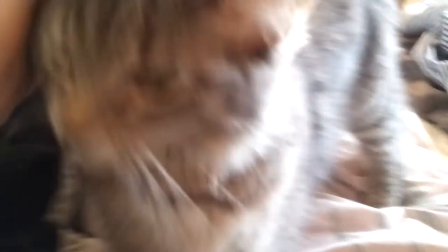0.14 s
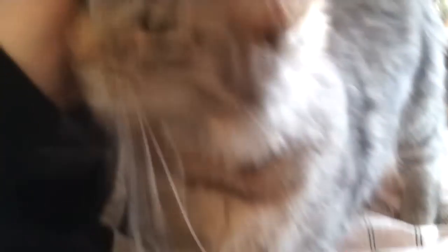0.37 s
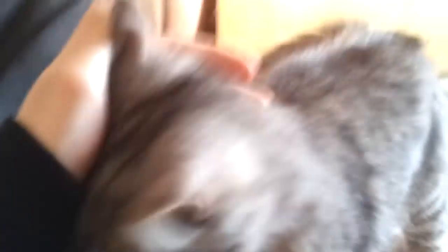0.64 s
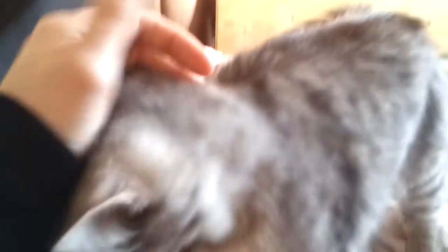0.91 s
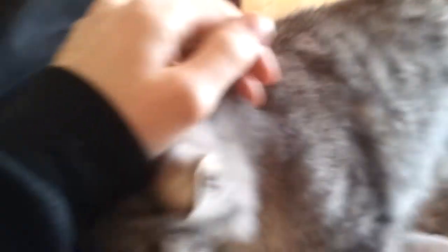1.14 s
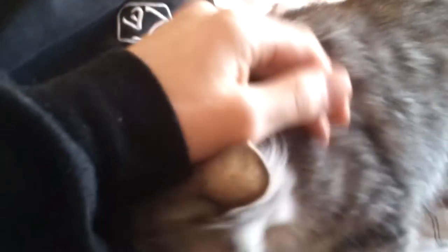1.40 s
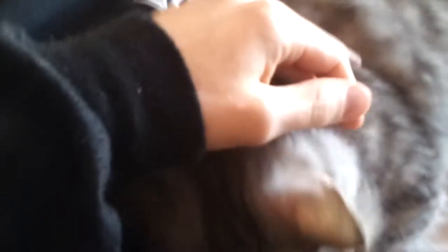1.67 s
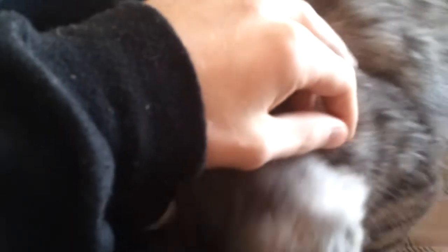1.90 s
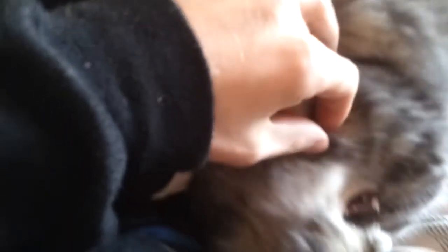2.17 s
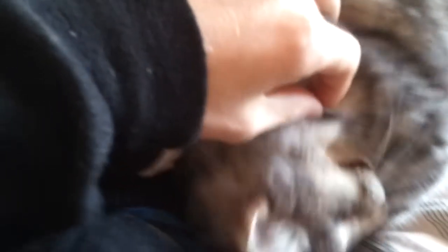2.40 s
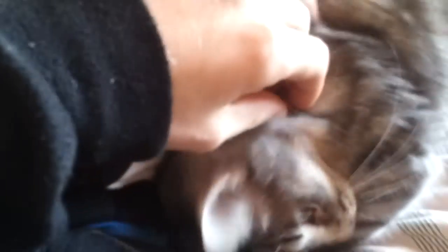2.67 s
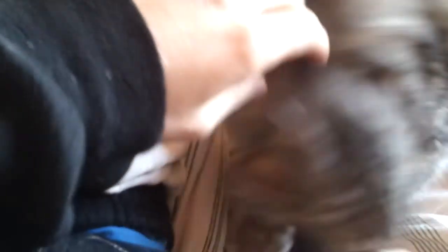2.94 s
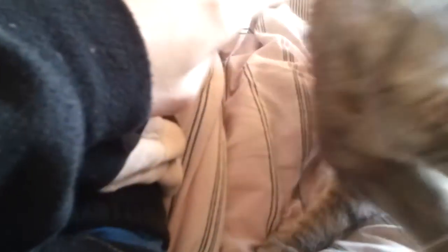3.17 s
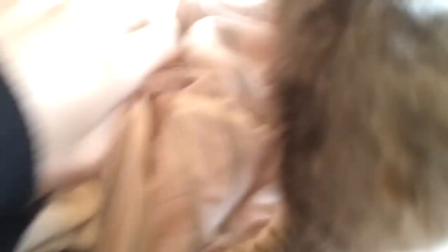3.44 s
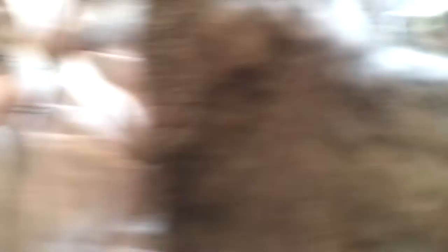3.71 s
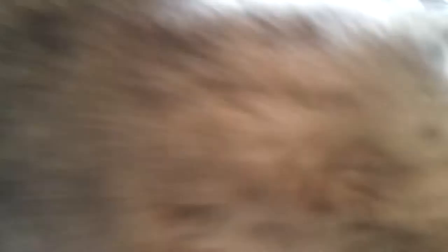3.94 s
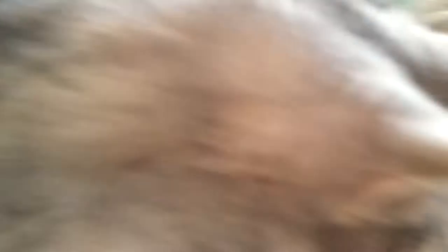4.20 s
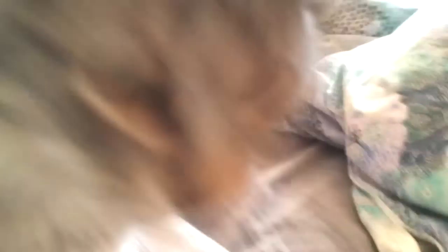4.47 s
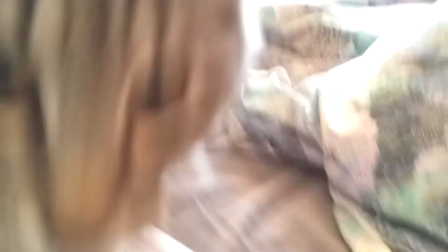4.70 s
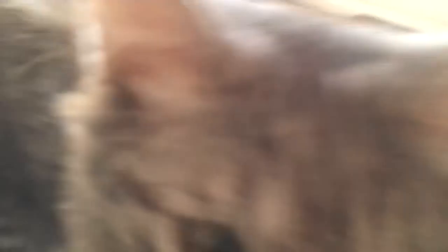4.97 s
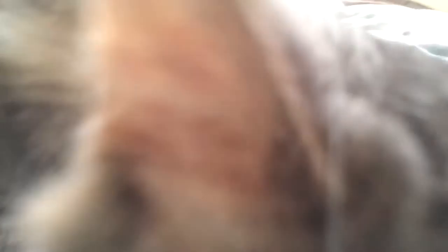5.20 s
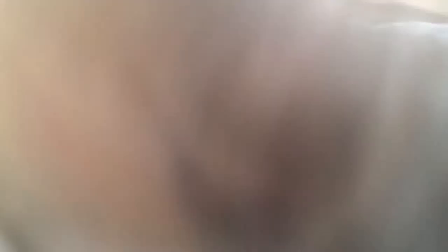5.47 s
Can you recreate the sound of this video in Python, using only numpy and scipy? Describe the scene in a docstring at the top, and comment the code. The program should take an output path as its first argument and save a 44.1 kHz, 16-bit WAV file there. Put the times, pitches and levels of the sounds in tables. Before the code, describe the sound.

A cat purrs close to a handheld phone, dry and intimate, over steady soft hiss and lumpy low hand rumble. From 0 s the purr is a low, throaty flutter of about thirty beats a second, with breathy rattles around 0.3 and 0.55 s and a soft push at 0.53. At about 1.15 s a breathy trill bursts out and passes at 1.3 into a thin meow, rising quickly from a chirpy, hoarse start to a high, nearly level tone, brightening as the mouth opens, then dropping and breaking at 2.35. A light fur rub follows; the purr returns, strongest near 3 s, with a small double click there. Dull fur strokes brush past at 3.7-4.7 s, with faint taps at 3.73 and 4.5. From 5 to 5.4 s raspy, airy trilled puffs come forward. At 5.44-5.6 s loud cracks, thumps and coarse fur friction end it abruptly.

```python
"""On a bed, close to a phone, a cat purrs: its larynx beats about thirty times a second, in and out,
and every beat makes the chest ring. At times it opens its mouth and the beats chop the breath noise
into a trill; an early trill passes into a thin meow, harmonics weighted by the mouth's resonances.
Fur brushes the phone as clumpy noise, and soft pushes and hard contacts knock its case.
Under it all lie coloured noises: microphone hiss and the rumble of the holding hand."""
import sys
import numpy as np
from scipy import signal
from scipy.fft import rfft, irfft, next_fast_len
from scipy.io import wavfile
from scipy.ndimage import uniform_filter1d, map_coordinates

SR = 44100
rng = np.random.default_rng(int(sys.argv[2]) if len(sys.argv) > 2 else 0)


def boost(x):
    """Linear amplitude factor 10**(x/20) for a level x in decibels (scalar or array-like)."""
    u = np.asarray(x, float) / 20
    return 10 ** u


def int16_out(signal):
    """Quantize to a 16-bit WAV file."""
    q = np.round(np.clip(np.atleast_2d(signal).T, -1, 1) * 32767)
    wavfile.write(sys.argv[1], SR, q.astype(np.int16))


N = 246959
T = np.arange(N) / SR

# Runs of beats: a half breath or part of one; one run fills the meow.
# Each row: first beat and last beat in seconds, number of beats.
RUNS = [(0, .084, 4), (.115, .768, 22), (.797, 1.066, 10), (1.107, 1.107, 1), (1.163, 1.329, 7),
        (1.355, 2.25, 31), (2.28, 2.59, 11), (2.652, 2.75, 4), (2.825, 3.027, 8), (3.06, 3.16, 4),
        (3.227, 3.456, 8), (3.488, 3.96, 16), (3.983, 4.298, 12), (4.335, 4.82, 17), (4.852, 4.996, 6),
        (5.014, 5.091, 4), (5.12, 5.206, 4), (5.233, 5.286, 3), (5.324, 5.408, 4), (5.437, 5.615, 7)]
# The chest in each run of beats, all but silent under the meow.
# Each row: level at the start and at the end in dB, nominal resonance in Hz, strain 0-1.
CHEST = [(-53, -54.5, 220, .1), (-52, -52.5, 179, 0.08), (-59, -50, 213, 0.07), (-49, -51, 224, .1),
         (-56.5, -53.5, 240, 0.32), (-92, -93, 200, 0.28), (-62, -66, 210, 0.04), (-55, -58, 217, .02),
         (-51.5, -45, 234, 0.28), (-42, -55.5, 205, 0.31), (-49.5, -64.5, 183, 0.03),
         (-55.5, -56.5, 160, 0.01), (-51.5, -52.5, 222, 0.05), (-52, -54.5, 165, 0.07),
         (-55.5, -63, 187, 0.07), (-60, -54, 260, 0.25), (-55.5, -51.5, 264, 0.24),
         (-47.5, -45.5, 245, 0.1), (-47, -47, 240, 0.03), (-70, -62, 210, 0.07)]


def purr():
    """Impulse response: each beat, and the folds' reopening, rings the chest; airflow flutters around it."""
    width_hz, attack_s = 114, 0.00051
    reopen_s, reopen_db, strain_db = 0.00621, -9, -4  # unstrained delay and level, change at full strain
    flutter_peak_s, flutter_width_s = .022, 0.012

    beats = np.zeros(N)
    t = np.arange(SR // 20) / SR

    def ring(hz):
        decay = np.exp(-np.pi * width_hz * t)
        return np.sin(2 * np.pi * hz * t) * decay * (1 - np.exp(-t / attack_s))

    luck = rng.standard_normal((220, 5))
    airflow = rng.standard_normal((220, 2 * len(t)))
    for at, (size, late, pitch, size2, pitch2), air in zip(beat_times(), luck, airflow):
        *_, hz, strain = [chest for run, chest in zip(RUNS, CHEST) if run[0] <= at][-1]
        start = max(at - .002 + .0003 * late, 0)
        add(beats, start, boost(size) * ring(hz * (1 + .03 * pitch)))

        again = boost(reopen_db + strain_db * strain + 0.98 * size2)
        delay = reopen_s * (1 + 1.87 * strain)
        add(beats, start + delay, again * ring(1.3 * hz * (1 + .05 * pitch2)))

        flap = signal.iirpeak(hz, 1.1, fs=SR)
        flutter = signal.lfilter(*flap, signal.lfilter(*flap, air))[len(t):]
        flutter = flutter * np.exp(-((t - flutter_peak_s) / flutter_width_s) ** 2)
        add(beats, max(start - flutter_peak_s, 0), strain * unit(flutter))

    beats = filtered(beats, lambda f: no_bass(f, corner_hz=83.0))
    loud = np.sqrt(np.abs(uniform_filter1d(beats ** 2, SR // 8)) + 1e-6)
    return purr_level() * beats / loud


def purr_level():
    """Amplitude envelope: each run of beats rises, drifts from its first level to its last and sinks."""
    rise_share, fall_share, dip_db = 0.085, .12, -8  # shares of a run; dip at the ends of a long one
    first, last, _ = np.transpose(RUNS)
    k = np.clip(np.searchsorted(first, T + .01) - 1, 0, None)
    length = (last - first + .03)[k]
    done = np.clip((T - first[k]) / length, 0, 1)
    start_db, end_db = np.transpose(CHEST)[:2, k]
    drift_db = start_db + done * (end_db - start_db)
    dip = np.exp(-done / rise_share) + np.exp((done - 1) / fall_share)
    dip = dip * np.minimum(length / 0.26, 1)  # short runs dip less
    return uniform_filter1d(boost(drift_db + dip_db * dip + 1.25 * wobble(7)), SR // 200)


def beat_times():
    """Periodic excitation: the moments of the larynx beats, even within each run."""
    return np.concatenate([np.linspace(*row) for row in RUNS])


def beat_phase():
    """Phase of the periodic excitation: where in its beat the larynx is, 0-1."""
    times = beat_times()
    return np.interp(T, times, np.arange(len(times))) % 1


def trill():
    """Amplitude modulation of turbulence: the folds shut once per beat; their edges creak unevenly."""
    # Puffs through the open mouth. Each row: start, peak and end in seconds, level at the peak in dB,
    # lean (below 0 each beat bursts then fades, above 0 it swells then stops).
    puffs = [(.18, .315, .41, -55.5, 3.8), (.44, .56, .65, -66, 3.4), (1.08, 1.1, 1.127, -62, 3),
             (1.14, 1.29, 1.43, -50, -5), (2.25, 2.35, 2.4, -51, -1.5), (4.99, 5.06, 5.14, -42, -.25),
             (5.04, 5.19, 5.25, -41.5, -.2), (5.226, 5.24, 5.29, -44, -5), (5.27, 5.3, 5.35, -43.5, -.6),
             (5.32, 5.4, 5.46, -49, 1.8)]
    slacken_s, slack_chop, slack_lean = .09, .55, -.3  # blowing out, folds start tight and slacken

    phase, flow = beat_phase(), np.zeros(N)
    for start, peak, end, db, lean in puffs:
        if lean < 0:
            tight = np.exp(-np.clip(T - start, 0, None) / slacken_s)
            burst = np.exp((slack_lean + tight * (lean - slack_lean)) * phase) * (phase < .8)
        else:
            tight = 1
            burst = np.exp(-lean * (1 - phase))
        burst = uniform_filter1d(burst, SR // 1500)
        burst /= np.sqrt(np.abs(uniform_filter1d(burst ** 2, SR // 16)))
        chop = slack_chop + tight * (1 - slack_chop)
        puff = boost(db) * arch(start, peak, end) * (1 - chop * (1 - burst))
        flow = np.maximum(flow, puff)

    creak = np.cumsum(250 * (1 + .25 * wobble(60))) / SR % 1  # phase of slips, near 250 a second
    grain = unit(.6 + np.exp(-creak / .2)) * boost(wobble(150) + wobble(700))
    hz, t, z = signal.stft(flow * grain * rng.standard_normal(N), SR, nperseg=256)
    shape = tract(hz[:, None], t) ** 0.88  # turbulence blurs the peaks
    shape = shape / np.sqrt(np.mean(shape ** 2, 0))
    return signal.istft(z * shape, SR, nperseg=256)[1][:N]


def meow():
    """Source and filter: harmonics weighted by the mouth; hoarseness shakes pitch and chops overtones."""
    # Each row: time in seconds, nominal pitch in Hz, fundamental and second harmonic levels in dB.
    melody = [(1.315, 415, -57, -66), (1.35, 365, -51, -59), (1.388, 450, -53, -55),
              (1.408, 430, -53.5, -55), (1.45, 520, -62, -54), (1.485, 565, -65, -57),
              (1.55, 545, -70, -56), (1.63, 566, -72, -60), (1.88, 552, -62, -62), (1.96, 544, -61, -59.5),
              (2.1, 549, -57.5, -58.5), (2.265, 536, -58, -55.5), (2.305, 500, -52, -55),
              (2.35, 485, -52, -60), (2.365, 450, -68, -74)]
    hoarse_start, clears_s, hoarse_held, breaks_s = .3, .06, .045, .045
    warble = .06  # share of pitch that each beat swings a fully hoarse voice

    cut = slice(round(melody[0][0] * SR), round(melody[-1][0] * SR))
    t, phase = T[cut], beat_phase()[cut]
    hz, first_db, over_db = curves(melody, t)

    hoarse = hoarse_held + hoarse_start * np.exp((t[0] - t) / clears_s)
    hoarse = hoarse + 1 / (1 + ((t[-1] - t) / (2 * breaks_s)) ** 8)  # the voice breaks at the end
    steady_shake = .0045 * wobble(60)[cut]
    beat_swing = warble * np.cos(2 * np.pi * (phase - .15))
    shake = steady_shake + hoarse * (.03 * wobble(150)[cut] + beat_swing)
    hz = hz * (1 + shake)
    turns = 2 * np.pi * np.cumsum(hz) / SR

    overtones = 0
    for k in range(2, 15):
        flicker = boost(1.8 * wobble(30)[cut] + k / 5 * wobble(6)[cut])
        gain = boost(over_db) * flicker * tract(k * hz, t) / tract(2 * hz, t)
        overtones += gain * np.sin(k * turns + rng.uniform(0, 2 * np.pi))

    chop = uniform_filter1d(1 - np.clip(hoarse, 0, 1) * (phase > .72), SR // 400)
    fundamental = boost(first_db + 2.0 * wobble(30.1)[cut]) * np.sin(turns)
    out = np.zeros(N)
    out[cut] = np.sqrt(2) * (fundamental + chop * overtones) * signal.windows.tukey(len(t), .03)
    return out


def tract(hz, t):
    """Formant resonance: gain of the mouth at hz and t, four steep moving peaks and weaker steady ones."""
    # Each row: time in seconds, first and second resonance in Hz, opening 0-1.
    mouth = [(.3, 1160, 2620, 0.94), (1.15, 950, 2000, 0), (1.3, 950, 2120, 0.45), (1.45, 940, 2240, 0.37),
             (1.55, 1210, 2440, 0.39), (1.66, 1280, 2000, 0.42), (1.77, 1270, 2200, 0.59),
             (1.88, 1223, 2100, 0.89), (2.0, 1170, 2200, 0.99), (2.25, 1120, 2100, 0.91),
             (2.37, 960, 2030, 0.87), (5.02, 977, 1860, 0.01), (5.13, 1080, 2160, 0.48),
             (5.22, 1070, 2130, 0.66), (5.27, 1100, 2200, 0.69), (5.33, 1080, 2800, .5)]
    # What opening does. Each row: opening 0-1, third and fourth resonance in Hz,
    # second, third and fourth resonance levels in dB over the first.
    postures = [(0, 4350, 4980, -14, -38, -26), (.4, 4400, 5340, -3.5, -10.5, -12),
                (.6, 4950, 5650, 1.5, -9.5, -11), (1, 4960, 5670, 4, 4.5, 2.9)]
    # Nominal widths of the four moving peaks in Hz.
    widths_hz = [450, 577, 656, 980]
    # Peaks that stay put. Each row: frequency in Hz, nominal width in Hz,
    # index of the moving peak whose level they follow (0 is the first), level relative to it in dB.
    steady_peaks = [(1677, 185, 1, -8.5), (2850, 550, 1, -15), (4000, 990, 2, -16), (6940, 2900, 3, -17)]

    def peak(centre, width, db):
        return boost(db) / (1 + (2 * (hz - centre) / width) ** 2) ** 1.7

    first, second, opening = curves(mouth, t)
    posture = curves(postures, opening)
    centres = [first, second] + posture[:2]
    levels = [0 * t] + posture[2:]
    moving = sum(peak(*p) for p in zip(centres, widths_hz, levels))
    return moving + sum(peak(c, w, levels[round(k)] + db) for c, w, k, db in steady_peaks)


def fur():
    """Friction noise: hairs slip over the case in clumps, a dull rub and a brighter swish."""
    # Strokes of the coat. Each row: start, peak and end in seconds, rub and swish levels in dB.
    strokes = [(2.334, 2.363, 2.73, -63, -72), (2.905, 2.97, 3.15, -64, -82),
               (3.71, 3.76, 3.85, -69, -65.5), (3.72, 3.882, 3.98, -55, -66), (3.9, 4.3, 4.73, -63, -63),
               (5.437, 5.505, 5.53, -42, -43), (5.524, 5.596, 5.64, -49.5, -43)]
    # Spectrum of the rub. Each row: frequency in Hz, relative level in dB per Hz.
    rub_spectrum = [(150, 0), (500, 6.5), (1000, 0.5), (2000, -12), (4000, -22.5)]
    # Spectrum of the swish. Each row: frequency in Hz, relative level in dB per Hz.
    swish_spectrum = [(700, -2.5), (1800, 4.5), (3000, -0.5), (5000, -2), (8000, -11.5), (12000, -14)]
    rub, swish = sum(boost([[rub_db], [swish_db]]) * arch(*when) for *when, rub_db, swish_db in strokes)
    clumps = boost(1.2 * wobble(40) + 2 * wobble(400))
    return unit(clumps) * (rub * noise(rub_spectrum) + swish * noise(swish_spectrum))


def knocks():
    """Impact: soft pushes give brief low tones, hard contacts give noise cracks that ring the case."""
    # Soft pushes. Each row: time in seconds, level in dB before filtering, frequency in Hz,
    # length in cycles.
    pushes = [(0.5346, -18.5, 500, 0.63), (1.513, -37.5, 196, 0.4), (2.994, -27.5, 373, 4.1),
              (3.021, -34, 383, 1.3), (3.734, -38.5, 295, 0.88), (4.505, -33, 385, 1.1),
              (4.941, -47, 247, 1.3), (5.442, -18.5, 112, 0.71), (5.479, -25.5, 331, 4.9),
              (5.487, -12.5, 363, 0.84), (5.528, -37.5, 123, 1.4), (5.562, -36, 254, 0.47)]
    # Hard contacts. Each row: time in seconds, level in dB before filtering, upper corner in Hz.
    contacts = [(2.998, -30.5, 1560), (3.024, -29.5, 1580), (3.734, -35, 1530), (4.505, -30, 2400),
                (4.943, -44.5, 8000), (5.4387, -27, 3500), (5.442, -13.5, 10500), (5.47, -38, 3110),
                (5.48, -36, 2980), (5.4864, -14.5, 10600), (5.569, -22.5, 4000), (5.581, -24.5, 5970),
                (5.5898, -24, 4970)]
    # Resonances of the phone case. Each row: frequency in Hz, width in Hz, gain in dB.
    case_modes = [(950, 316, 6), (2200, 620, 6.5), (3380, 670, -1.5), (5540, 640, -6), (8000, 10000, -15.5)]

    thumps, cracks, t = np.zeros(N), np.zeros(N), np.arange(SR // 30) / SR
    for s, db, hz, cycles in pushes:
        onset = np.tanh(5 * t * hz / cycles ** 2)  # soft contact
        push = onset * np.exp(-(t * hz / cycles) ** 2.85)
        add(thumps, s, boost(db) * push * np.sin(2 * np.pi * hz * t))
    for s, db, top_hz in contacts:
        crack = boost(db + 4 - 60 * t / 0.006) * rng.standard_normal(len(t))  # falls 60 dB in 6 ms
        add(cracks, s, signal.lfilter(*signal.butter(4, top_hz, fs=SR), crack))

    def case(f):
        modes = 0
        for k, (centre, width, db) in enumerate(case_modes):
            band = 1j * f * width / (centre * centre - f * f + 1j * f * width)
            modes = modes + (-1) ** k * boost(db) * band  # neighbours have opposite sign
        return modes

    return filtered(thumps, lambda f: no_bass(f, corner_hz=60)) + filtered(cracks, case)


def floor():
    """Stationary and modulated noise: steady microphone hiss, lumpy rumble of the holding hand."""
    # Spectrum of the hiss. Each row: frequency in Hz, relative level in dB per Hz.
    hiss_spectrum = [(15, -37), (25, -9.5), (446, -0.5), (549, -7), (997, -8.5), (1110, -6.5), (1200, -9),
                     (1630, -9.5), (2010, -10.5), (2170, -12), (2410, -11.5), (11100, -14.5), (12400, -16),
                     (16100, -58), (22000, -120)]
    # Hand tremor. Each row: time in seconds, level in dB.
    shake = [(0, -65), (.2, -64.5), (2.1, -67), (2.45, -61.5), (3.8, -70.5), (4.7, -58.5), (4.99, -67),
             (5.3, -55.5), (5.6, -53)]
    # Spectrum of the tremor. Each row: frequency in Hz, relative level in dB per Hz.
    tremor_spectrum = [(20, -3), (40, 2), (70, -4.5), (120, -12), (250, -48)]
    hiss_db = -59.5
    lumpy = unit(boost(1.3 * wobble(24)) * noise(tremor_spectrum))
    rumble = boost(curves(shake)[0]) * lumpy
    return boost(hiss_db) * noise(hiss_spectrum) + rumble


def arch(start, peak, end):
    """Gesture envelope: a gain that swells to its peak, fades, and is all but silent outside."""
    edge_db = -10.5  # at start and end, under the peak
    u = np.interp(T, [start - .015, start, peak, end, end + .015], [3, 1, 0, 1, 3])
    return boost(edge_db * u ** 2)


def no_bass(hz, corner_hz):
    """Second-order resonator response: a causal high-pass."""
    return -hz * hz / (corner_hz ** 2 - hz * hz + 1j * np.sqrt(2) * hz * corner_hz)


def noise(spectrum):
    """Spectral shaping: coloured noise of rms 1."""
    return unit(filtered(rng.standard_normal(N), lambda hz: boost(along(spectrum, hz))))


def filtered(x, response):
    """Convolution theorem: x times a complex response of frequency."""
    m = next_fast_len(N + 8192)
    return irfft(rfft(x, m) * response(np.fft.rfftfreq(m, 1 / SR)), m)[..., :N]


def wobble(rate):
    """Band-limited fluctuation: a smooth random curve, rate knots a second."""
    return map_coordinates(rng.standard_normal(int(N * rate / SR) + 4), [T * rate])


def unit(x):
    """Power normalisation: scale to rms 1."""
    return x / np.sqrt(np.mean(x ** 2) + 1e-20)


def along(points, hz):
    """Logarithmic frequency scale: interpolate (Hz, value) points on it."""
    f, v = np.transpose(points)
    return np.interp(np.log(hz + 1), np.log(f + 1), v)


def curves(rows, t=T):
    """Linear interpolation: one value per moment for each column after the first."""
    s, *cols = np.transpose(rows)
    return [np.interp(t, s, c) for c in cols]


def add(track, s, sound):
    """Superposition: mix a short sound in at s seconds."""
    part = track[round(s * SR):][:len(sound)]
    part += sound[:len(part)]


def scene():
    """Superposition of all sources: one microphone feeds both channels."""
    return np.tile(purr() + trill() + meow() + fur() + knocks() + floor(), (2, 1))


def top_cut(x):
    """Nothing passes above the cut-off."""
    return signal.sosfilt(signal.butter(12, 12520, fs=SR, output="sos"), x)


def record(dry):
    """Band limiting: nothing from 11.8 kHz up enters the finished mix."""
    mix = filtered(dry, lambda hz: hz < 11800)
    return top_cut(mix)


dry = scene()
out = record(dry)
int16_out(out)
```